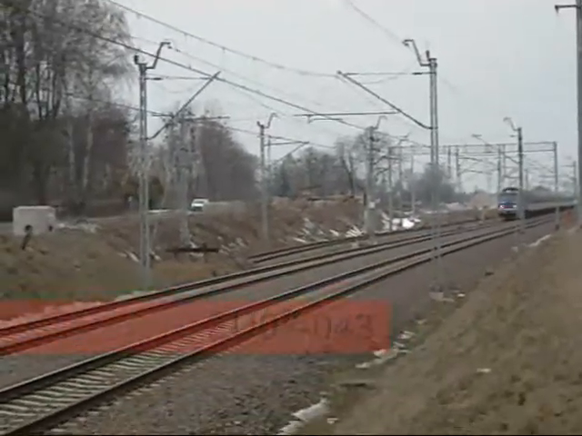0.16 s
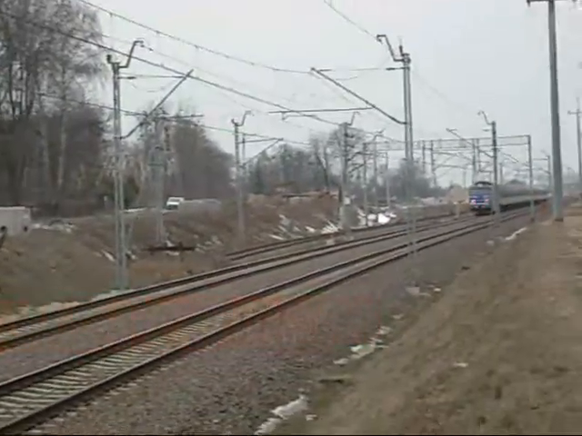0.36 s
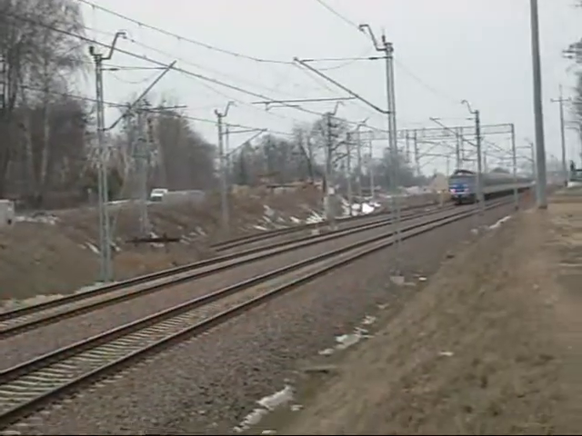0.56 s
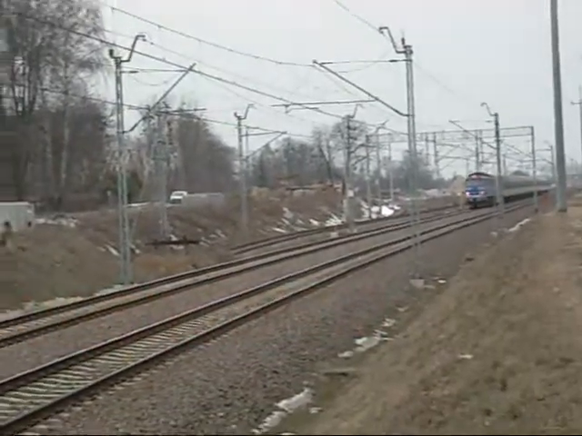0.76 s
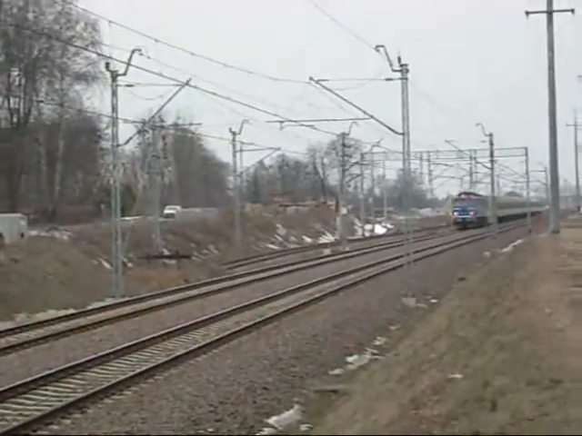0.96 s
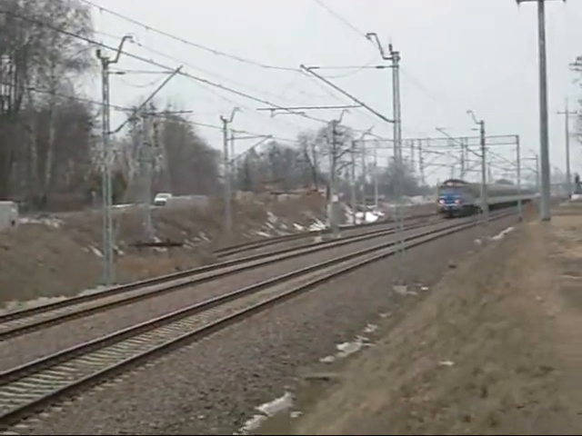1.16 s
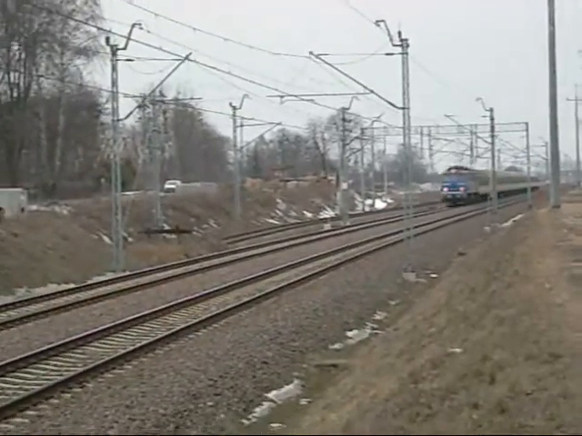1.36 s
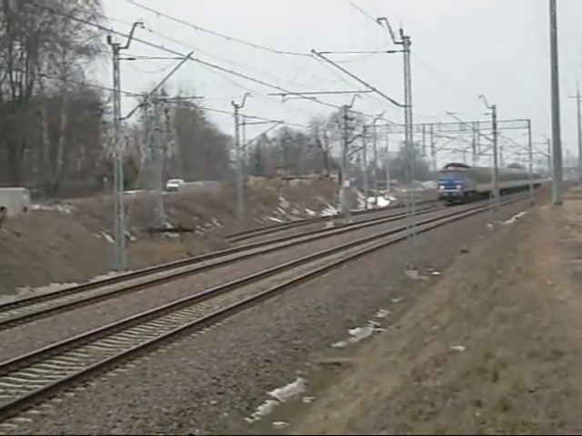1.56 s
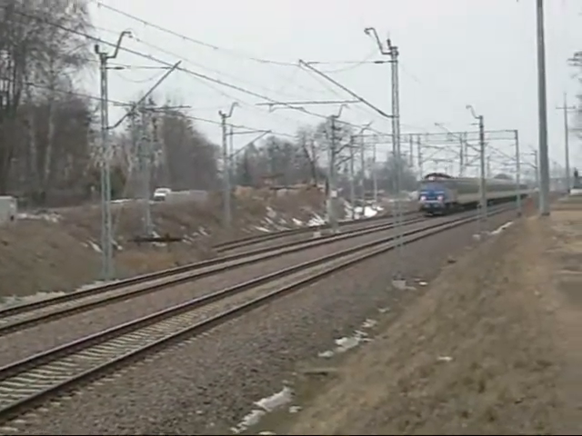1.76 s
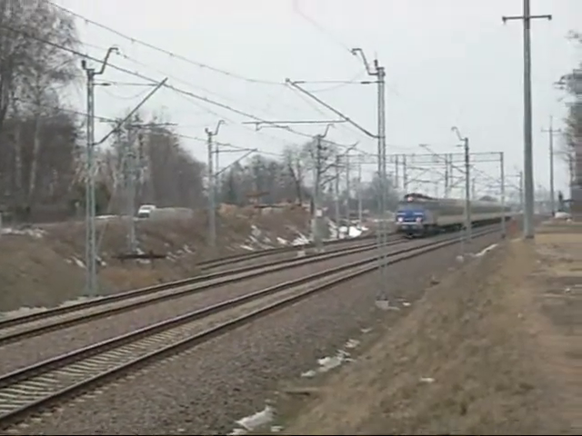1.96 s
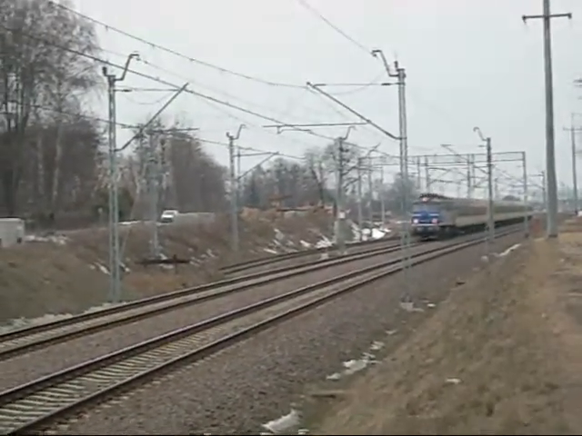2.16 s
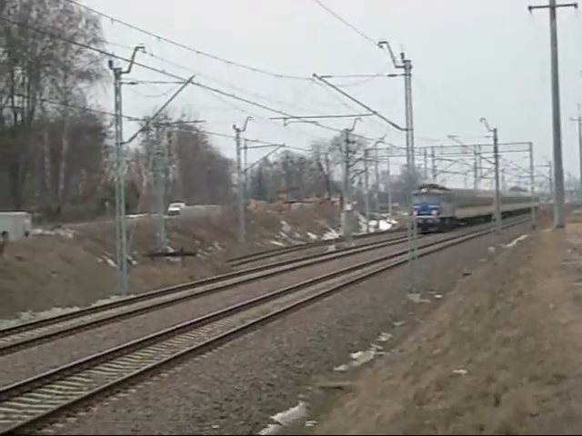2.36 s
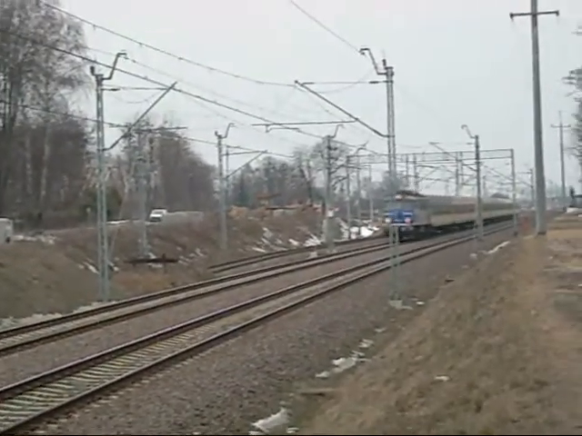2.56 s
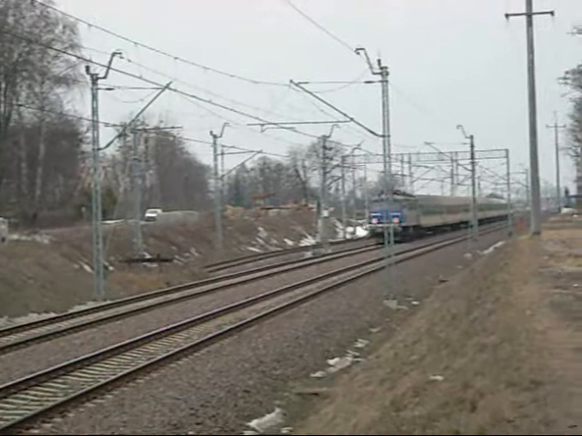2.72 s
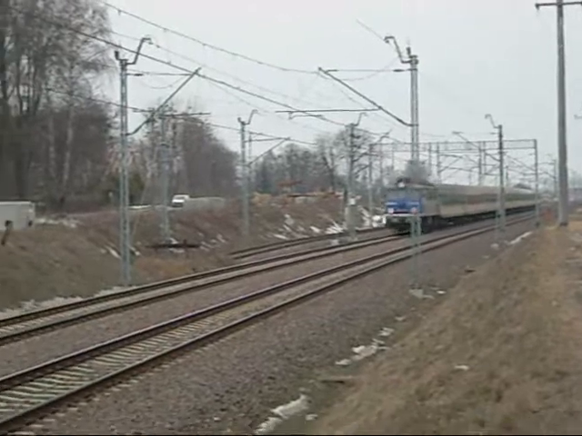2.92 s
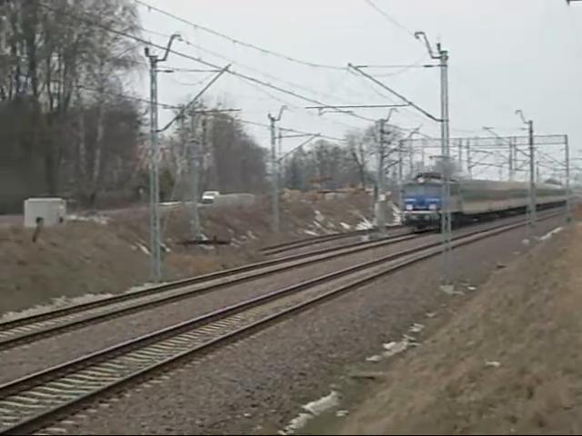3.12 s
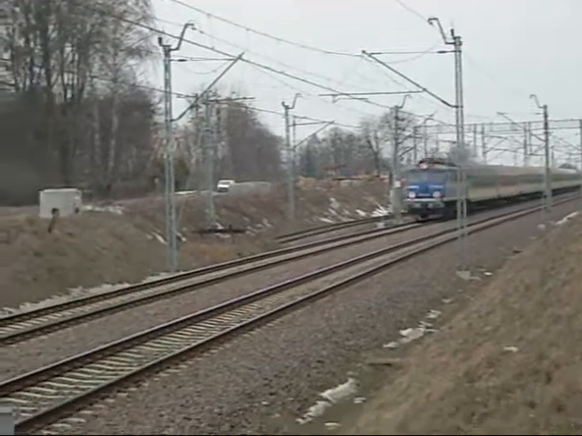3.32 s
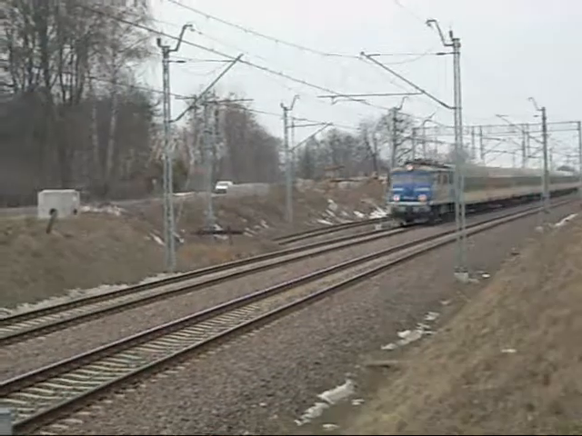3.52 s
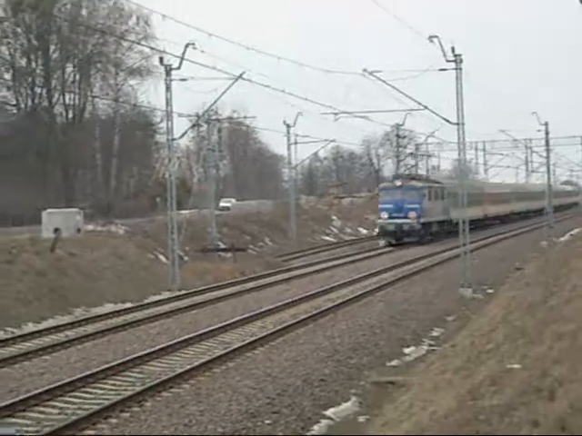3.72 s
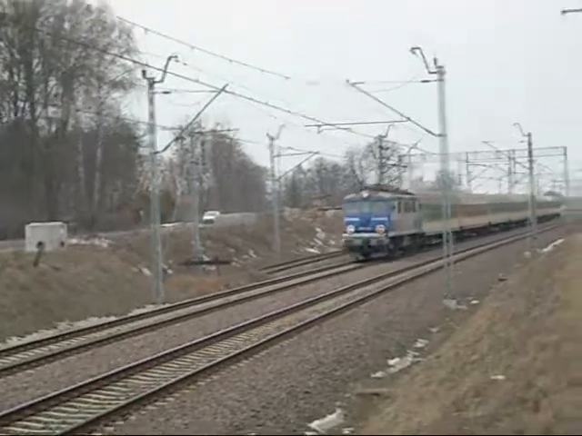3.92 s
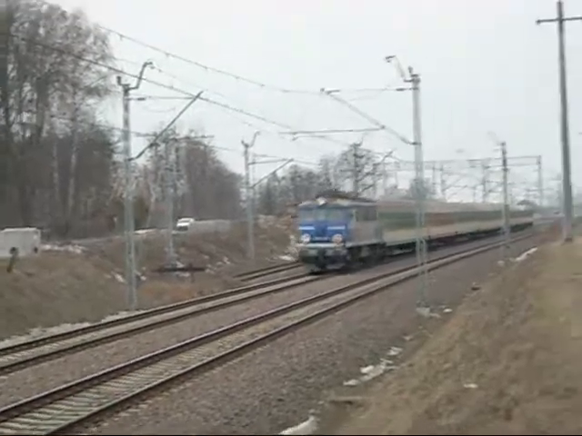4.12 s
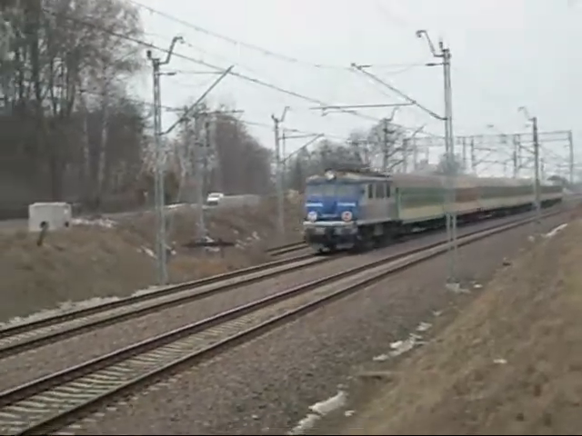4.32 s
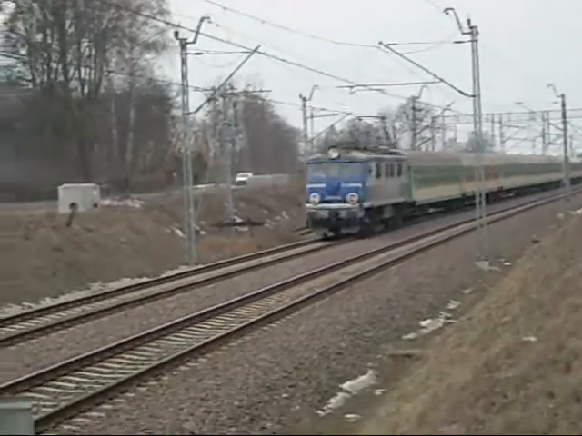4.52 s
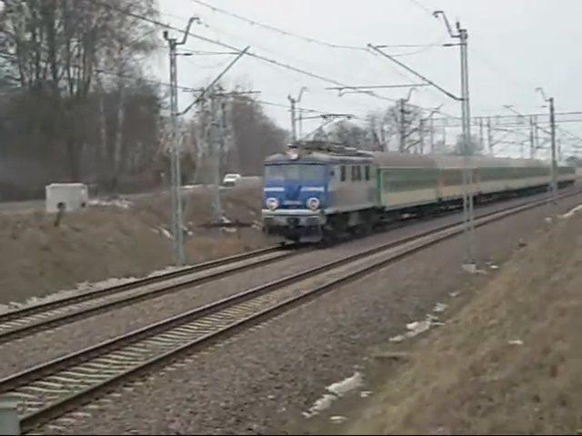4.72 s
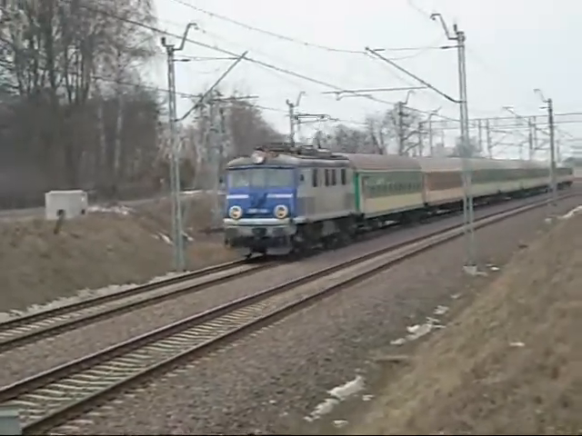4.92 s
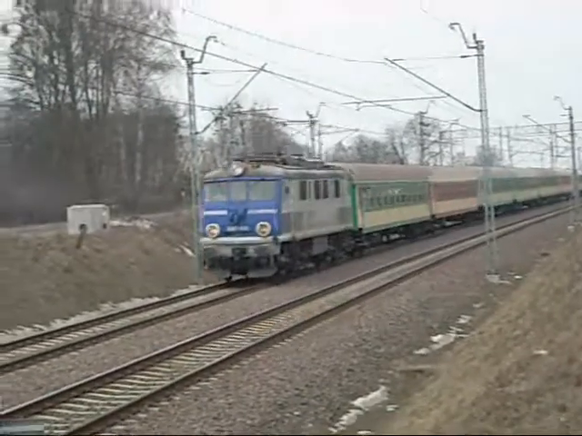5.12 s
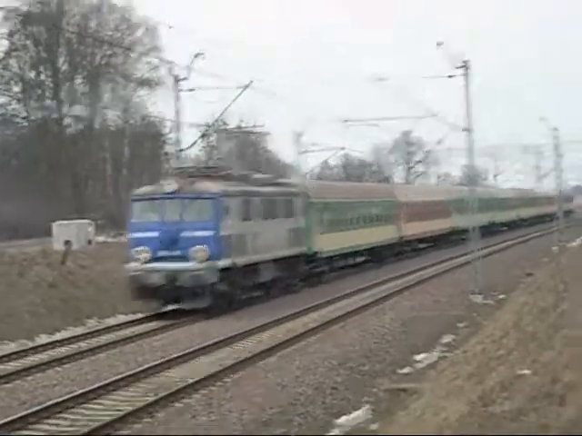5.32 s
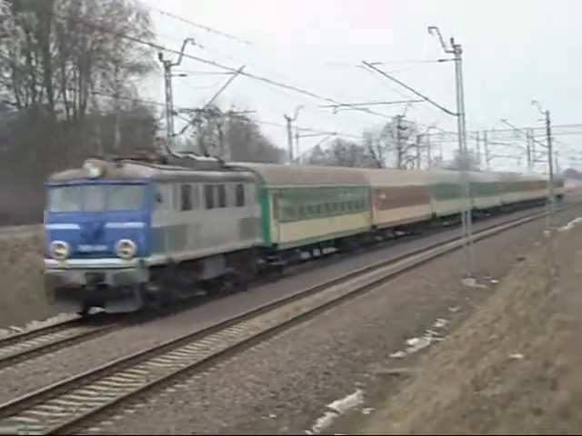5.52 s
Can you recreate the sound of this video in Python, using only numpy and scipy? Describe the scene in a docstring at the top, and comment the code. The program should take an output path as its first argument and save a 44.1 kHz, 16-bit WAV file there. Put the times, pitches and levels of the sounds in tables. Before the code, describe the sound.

Gusty wind buffets the microphone as a distant train's hiss and rail song grow into a loud, gritty rushing roar.

```python
"""The rush, roar and rail song of an electric locomotive with passenger carriages, approaching fast.
Shaped noise gives all three; part repeats with each wheel turn, rush and roar swell as distance shrinks.
Faint drive tones waver beneath. Wind rumbles, flutters and strikes the microphone as brief buffets.
The small camera overloads and holds each sample, which adds a gritty treble."""
import sys
import numpy as np
from scipy import signal
from scipy.fft import rfft, irfft
from scipy.io import wavfile

SR = 44100
rng = np.random.default_rng(int(sys.argv[2]) if len(sys.argv) > 2 else 0)


def generate_wav(signal):
    """Clip the signal to [-1, 1] and save it as 16-bit WAV at the path in sys.argv[1]."""
    frames = np.transpose(np.atleast_2d(signal))
    scaled = np.clip(frames, -1, 1) * 32767
    pcm = np.round(scaled).astype(np.int16)
    wavfile.write(sys.argv[1], SR, pcm)


N = 245637
TIME, FREQS = np.arange(N) / SR, np.fft.rfftfreq(N, 1 / SR)
WHEEL_TURN_S = 0.1147


def gain_of(db):
    """Decibels to amplitude."""
    return 10 ** (np.asarray(db) / 20)


def evened(x):
    """Scales to rms 1."""
    return x / np.sqrt(np.mean(x ** 2) + 1e-20)


def curves(rows):
    """Interpolates each column of a table over time, the first column."""
    time_s, *columns = np.transpose(rows)
    return [np.interp(TIME, time_s, column) for column in columns]


def coloured(x, spectrum):
    """Filters x by a spectrum drawn over log frequency, with steeper skirts outside it; rms 1."""
    hz, db = np.transpose(spectrum)
    gain = gain_of(np.interp(np.log(FREQS + 1), np.log(hz), db))
    low_skirt = np.minimum(FREQS / hz[0], 1) ** 2
    high_skirt = np.minimum(hz[-1] / (FREQS + 1), 1) ** 4
    return evened(irfft(rfft(x) * gain * low_skirt * high_skirt, N))


def steadied(x, seconds):
    """Divides out swells slower than the given time."""
    window = signal.windows.hann(int(seconds * SR))
    power = signal.fftconvolve(x ** 2, window / window.sum(), "same")
    return x / np.sqrt(power + 1e-6)


def blend(a, b, share):
    """Mixes two unrelated sounds; b gets the given share of the power."""
    share = np.clip(share, 0, 1)
    return np.sqrt(1 - share) * a + np.sqrt(share) * b


def wobble(rate_hz):
    """Slow random drift at rms 1: noise under a Gaussian low-pass."""
    noise = rng.standard_normal(N)
    return evened(irfft(rfft(noise) * np.exp(-(FREQS / rate_hz) ** 2), N))


def approach():
    """Roar and rush levels in dB: steady speed on a straight track, a fixed loss per doubling of distance."""
    # slow swell and sag of the rush around the distance law: (time [s], level [dB])
    swell = [(0, -2), (.45, .5), (1.0, -.6), (2.2, 1.3), (2.6, -1.1), (3.0, 0), (3.4, -.6), (3.85, 2),
             (4.2, 1.4), (5.2, 1.9), (5.57, -.3)]
    speed_m_per_s, passes_at_s, track_m, near_m = 33.3, 6.483, 18, 40
    roar_db_at_near, roar_db_per_doubling = -10.5, 7.6
    rush_db_at_near, rush_db_per_doubling = -11.2, 6.1
    along_m = speed_m_per_s * (passes_at_s - TIME)
    doublings = np.log2(np.hypot(along_m, track_m) / near_m)
    swell_db, = curves(swell)
    roar_db = roar_db_at_near - roar_db_per_doubling * doublings
    rush_db = rush_db_at_near - rush_db_per_doubling * doublings + swell_db
    return roar_db, rush_db


def rolling(far, near, nearness, repeating):
    """Rail roughness is always new, tread roughness comes round each turn; both ring in the steel."""
    def contact(spectrum):
        """Wheel on rail: fresh noise blended with noise looped at the wheel turn."""
        rail = rng.standard_normal(N)
        tread = np.resize(rng.standard_normal(round(WHEEL_TURN_S * SR)), N)
        return blend(coloured(rail, spectrum), coloured(tread, spectrum), repeating)
    return steadied(blend(contact(far), contact(near), nearness), seconds=0.23)


def whine(waver_hz_at_600=2.517, fading=0.47):
    """Tones of the drive, each beamed its own way, wavering and fading on their way through the air."""
    # drive tones: (frequency [Hz], level re roar [dB], loudest at [s], Gaussian spread [s])
    tones = [(398, -21, 3.46, 1.37), (608, -22.5, 6.2, 1.4), (631.4, -14, 5.8, 2.2), (683, -10.5, 6.5, 1.5),
             (727, -11, 5.55, 0.42), (946, -10.5, 3.6, 1.8), (2226, -14, 4.6, 0.75)]
    out = np.zeros(N)
    for hz, db, loudest_s, spread_s in tones:
        waver_hz = waver_hz_at_600 * hz / 600 * wobble(6.05)
        turns = np.cumsum(hz + waver_hz) / SR
        beam = np.exp(-0.5 * ((TIME - loudest_s) / spread_s) ** 2)
        tone = (1 + fading * wobble(4.5)) * np.sin(2 * np.pi * turns)
        out += gain_of(db) * beam * evened(tone)
    return out


def train(far_db=-25.5, near_db=-14, rush_repeating=0.048, throb_peak_s=2.243,
          surge_s=0.016, shimmer_db=0.42, churn_db=0.8):
    """Roar, rail song and rush of wheels on rails; each changes colour as the train comes near."""
    # far and near spectra of each layer, and the low rolling noise: (frequency [Hz], density [dB])
    roar_far, roar_near = [(250, -17), (470, -17.5), (610, -5.5), (900, -4), (955, -0.5), (1030, 3),
                           (1085, -2.5), (1130, -4), (1450, -14)], [(220, -15), (350, -18), (460, -9), (560, -5.5), (620, 2.5),
                                             (720, 2.5), (850, 1.5), (980, 3), (1060, -5.5), (1120, -3.5),
                                             (1450, -9.5)]
    song_far, song_near = [(1100, -18), (1170, -10.5), (1260, -13), (1278, -2.5), (1360, -1), (1398, -19),
                           (1500, -31)], [(1120, -31), (1180, 0.5), (1230, 1.5), (1290, -5.5),
                                             (1365, -6), (1400, -7), (1500, -38)]
    rush_far, rush_near = [(1000, -16.5), (1420, -8.5), (1600, -0.5), (1760, 1.5), (2000, -2), (2400, -4),
                           (2650, -7.5), (3300, -11), (3750, -11), (4000, -20.5), (4200, -36)], [(1000, -5), (1420, -5.5), (1600, 0.5), (1950, 0), (2120, 1.5),
                                             (2250, 4), (2370, 0.5), (2650, -3.5), (3300, -4), (3750, -4.5),
                                             (4000, -8), (4200, -47)]
    bass_spectrum = [(45, -4), (100, -2), (180, -0.5), (260, -7), (350, -24)]
    # song swelling and fading along the rails: (time [s], level [dB])
    song_level = [(0, -27.5), (0.25, -25.5), (0.62, -28.5), (0.85, -24.5), (1.35, -25.5), (1.8, -21),
                  (2.5, -21.5), (3.0, -23), (3.2, -20), (3.5, -24), (4.0, -19), (4.35, -19.5), (4.7, -16.5),
                  (5.4, -18), (5.57, -21)]
    # wheel repetition: (time [s], share of roar power [0-1], share of song power [0-1], song throb [dB])
    repetition = [(0, 0.24, 0.63, 0), (1.8, .27, 1, 1.), (2.3, 0.23, 0.88, 6), (2.8, 0.28, .55, -1),
                  (4.6, 0.22, 0.4, 2.4), (5.57, 0.12, 0.31, 4.5)]
    # brief surges and dips: (time [s], roar and song level [dB], rush level [dB])
    surges = [(3.725, 1.5, 1), (3.845, 2.5, 2.5), (4.055, 1.5, 1), (4.47, 1.5, 2), (4.65, 4.5, -3.5),
              (4.735, 2.5, 3), (4.785, 0, 2.5), (5.088, 2, -0.5), (5.32, -2.5, 1.5)]

    roar_db, rush_db = approach()
    song_db, = curves(song_level)
    roar_repeating, song_repeating, throb_db = curves(repetition)
    nearness = np.clip((rush_db - far_db) / (near_db - far_db), 0, 1)
    surge_times, *surge_sizes = np.transpose(surges)
    surge_shapes = np.exp(-((TIME - surge_times[:, None]) / surge_s) ** 2)
    low_surge_db, high_surge_db = np.array(surge_sizes) @ surge_shapes
    throb = np.cos(2 * np.pi * (TIME - throb_peak_s) / WHEEL_TURN_S)  # a tread is rougher on one side

    bass = gain_of(-19.5) * coloured(rng.standard_normal(N), bass_spectrum)  # dB re roar
    gear = rolling(roar_far, roar_near, nearness, roar_repeating) + whine() + bass
    rails = rolling(song_far, song_near, nearness, song_repeating)
    wheels = rolling(rush_far, rush_near, nearness, rush_repeating)
    roar = gain_of(roar_db + low_surge_db + churn_db * wobble(25.0)) * gear
    song = gain_of(song_db + low_surge_db + throb_db * throb) * rails
    # gusty air makes the rush shimmer
    rush = gain_of(rush_db + high_surge_db + shimmer_db * wobble(10.6)) * wheels
    return roar + song + rush


def wind(lumpy_db=3.5, lumps_hz=22):
    """Turbulence over the microphone: gusts rise, hold and fall, with a slow rumble and a lumpy flutter."""
    # gusts: (start [s], length [s], rumble level [dB], flutter level [dB])
    gusts = [(0.0, .13, -17.5, -23), (0.256, 0.053, -19.5, -24), (0.362, 0.15, -20.5, -25),
             (.52, 0.17, -15, -22.5), (.69, .18, -19.5, -20), (0.92, 0.092, -17, -21),
             (1.026, .17, -13, -18.5), (1.23, 0.063, -21, -19), (1.394, 0.24, -16, -21),
             (1.674, 0.21, -14.5, -19), (1.905, 0.097, -9, -12.5), (2.054, 0.15, -17.5, -23.5),
             (2.224, 0.17, -20.5, -18.5), (2.545, .09, -19, -20), (2.67, .15, -21, -21),
             (2.87, 0.088, -30, -25), (3.108, 0.13, -27, -19), (3.311, .04, -24, -22), (3.40, .1, -26, -18),
             (3.59, .13, -21, -22), (3.957, .04, -28, -27), (4.05, .04, -31, -28), (4.428, .04, -35, -28),
             (4.583, .04, -32, -29), (4.692, .05, -31, -26), (5.14, 0.044, -22, -23), (5.33, .11, -28, -19),
             (5.47, .1, -20, -19.5)]
    # wind spectra: (frequency [Hz], density [dB])
    rumble_spectrum, flutter_spectrum = [(8, -21), (22, 0.5), (45, 0), (90, -3.5), (130, -9), (260, -79)], [(50, -9), (100, 1), (160, 2), (250, -6),
                                                         (380, -17.5), (600, -23.5), (1200, -67)]
    rise_s, fall_s = 0.015, 0.019
    breeze_rumble_db, breeze_db_per_s, breeze_flutter_db = -25.5, -1.2, -39
    # between gusts the breeze's rumble slowly drops
    rumble_gain = gain_of(breeze_rumble_db + breeze_db_per_s * TIME)
    flutter_gain = gain_of(breeze_flutter_db)
    for start_s, length_s, rumble_db, flutter_db in gusts:
        rise = (TIME - start_s) / rise_s
        fall = (start_s + length_s - TIME) / fall_s
        gust = np.clip(0.5 + 0.5 * np.minimum(rise, fall), 0, 1)
        rumble_gain = np.hypot(rumble_gain, gain_of(rumble_db) * gust)
        flutter_gain = np.hypot(flutter_gain, gain_of(flutter_db) * gust)
    rumble = steadied(coloured(rng.standard_normal(N), rumble_spectrum), seconds=0.19)
    flutter = steadied(coloured(rng.standard_normal(N), flutter_spectrum), seconds=0.091)
    lumpy_flutter = evened(flutter * gain_of(lumpy_db * wobble(lumps_hz)))
    return rumble_gain * rumble + flutter_gain * lumpy_flutter


def buffets(level_db=-0.5, octaves=0.63, suction=0.38):
    """Eddies striking the microphone: each blends a dip of pressure with a short swell of low noise."""
    # eddies: (middle [s], level re level_db [dB], centre frequency [Hz], length [s])
    eddies = [(0.364, -17.5, 190, 0.012), (0.546, -15.5, 220, 0.029), (0.59, -14, 210, 0.0083),
              (0.618, -5.5, 75, 0.02), (0.705, -14, 161, 0.0071), (0.764, -9, 170, 0.0084),
              (0.926, -12, 150, 0.019), (0.954, -12, 220, 0.0089), (1.05, -6.5, 120, 0.017),
              (1.074, -8, 240, 0.011), (1.142, -14, 200, 0.007), (1.255, -17, 160, 0.0077),
              (1.412, -8, 196, 0.009), (1.45, -18, 180, 0.008), (1.547, -16, 210, 0.008),
              (1.572, -11, 171, 0.011), (1.639, -7.5, 219, 0.009), (1.697, -6.5, 165, 0.015),
              (1.858, -8, 190, 0.011), (1.91, -14.5, 250, 0.01), (1.936, -1, 217, 0.0097),
              (1.956, -0.5, 276, 0.005), (2.082, -3, 270, 0.012), (2.311, -5.5, 220, 0.019),
              (2.333, -5.5, 180, 0.019), (2.68, -17.5, 190, 0.018), (2.904, -14.5, 168, 0.012),
              (2.95, -14, 165, 0.0083), (3.347, -18, 159, 0.011), (3.454, -8.5, 173, 0.026),
              (3.609, -13, 210, 0.0053), (3.679, -10, 189, 0.011)]
    out, size = np.zeros(N), 8192
    t, hz = (np.arange(size) - size // 2) / SR, np.fft.rfftfreq(size, 1 / SR)
    for middle_s, db, centre_hz, length_s in eddies:
        band = np.exp(-0.5 * (np.log2((hz + 1) / centre_hz) / octaves) ** 2)
        swell = np.exp(-2 * (t / length_s) ** 2)
        churn = swell * irfft(rfft(rng.standard_normal(size)) * band)
        dip = -np.exp(-abs(t) * 2 * np.pi * centre_hz)
        eddy = blend(evened(churn), evened(dip), suction)
        eddy *= np.linalg.norm(swell) / np.linalg.norm(eddy)  # same energy as the swell
        out += gain_of(db + level_db) * np.interp(TIME, middle_s + t, eddy, left=0, right=0)
    return out


def scene():
    """The train and the wind at one microphone, which ignores steady pressure."""
    pressure = train() + wind() + buffets()
    high_pass = signal.butter(1, 14, "highpass", fs=SR, output="sos")
    return signal.sosfilt(high_pass, pressure)[None]


def record(dry):
    """The camera clips, samples slowly and holds: the sound is mirrored around multiples of that rate."""
    hold_hz, edge_hz, ceiling = 8012, 15780, 0.96
    last_sample_s = np.floor(TIME * hold_hz) / hold_hz
    stairs = np.clip(np.interp(last_sample_s, TIME, dry[0]), -ceiling, ceiling)
    low_pass = signal.firwin(611, edge_hz, window=("kaiser", 8), fs=SR)
    return signal.fftconvolve(stairs, low_pass, "same")[None]


dry = scene()
out = record(dry)
generate_wav(out)
```